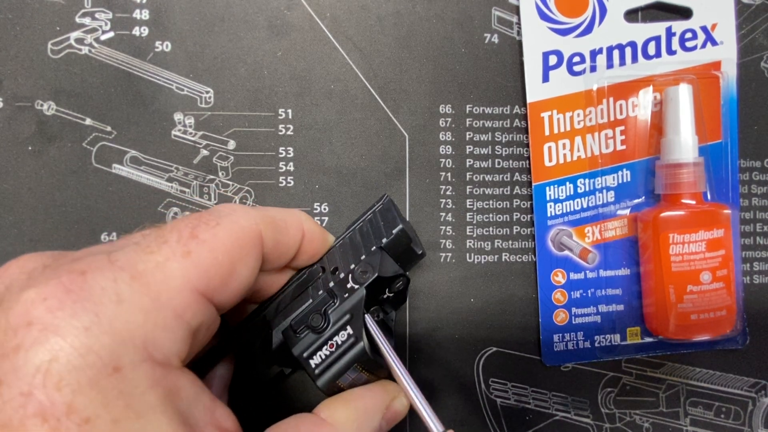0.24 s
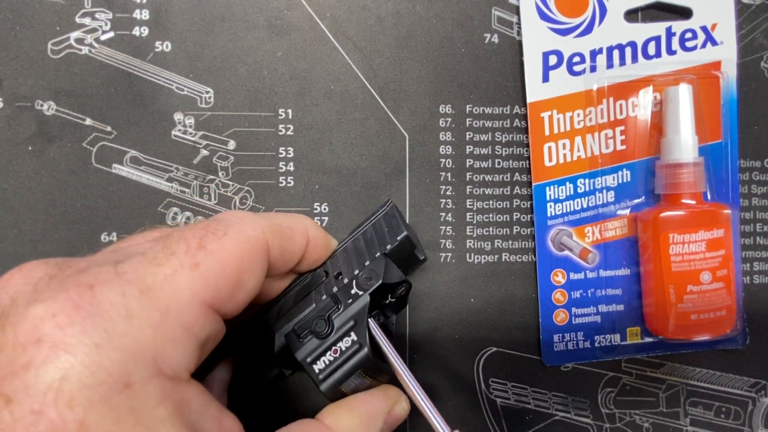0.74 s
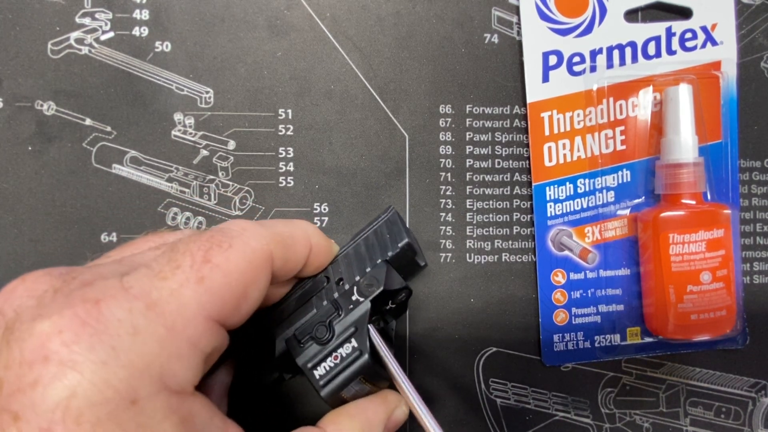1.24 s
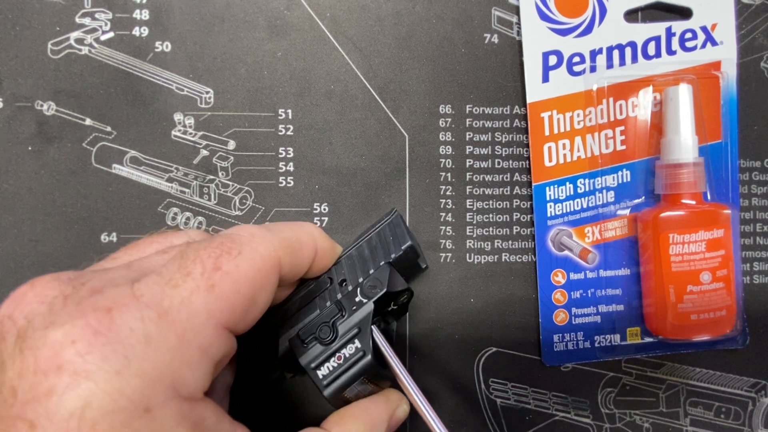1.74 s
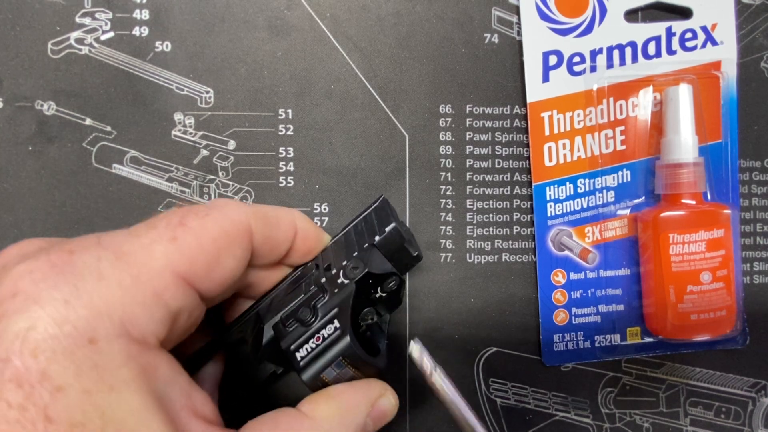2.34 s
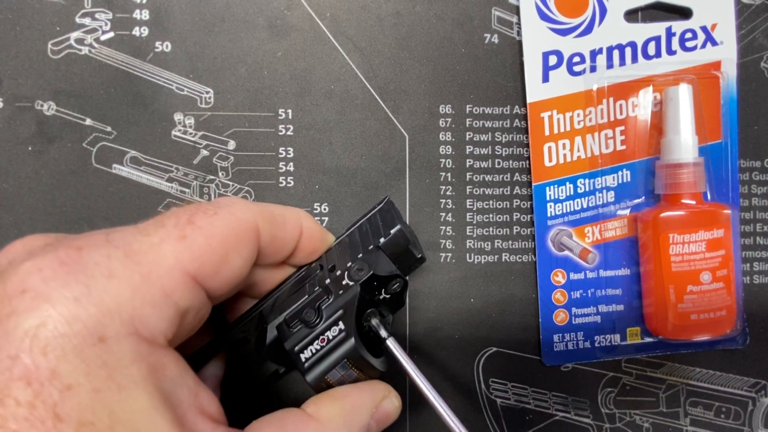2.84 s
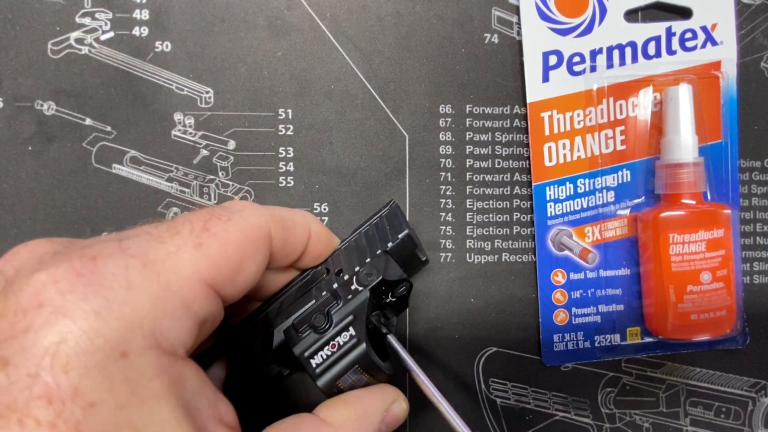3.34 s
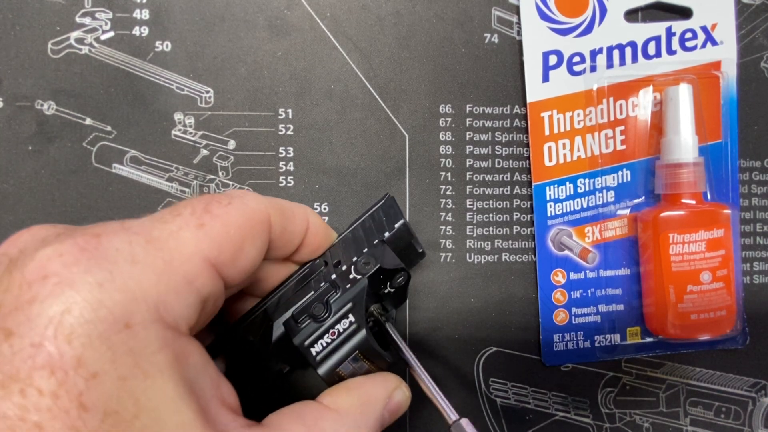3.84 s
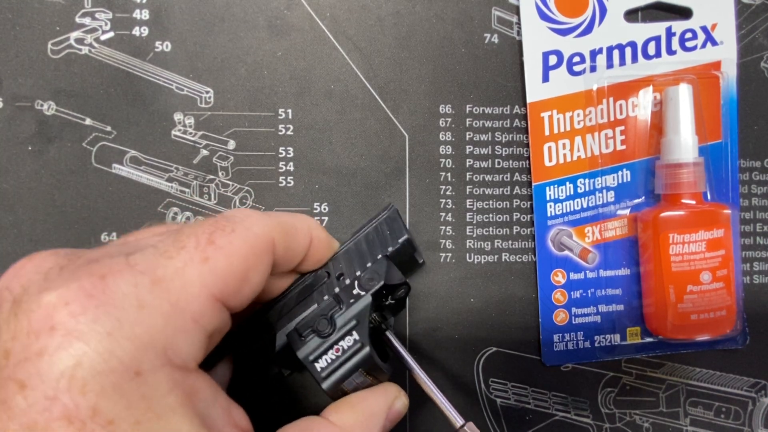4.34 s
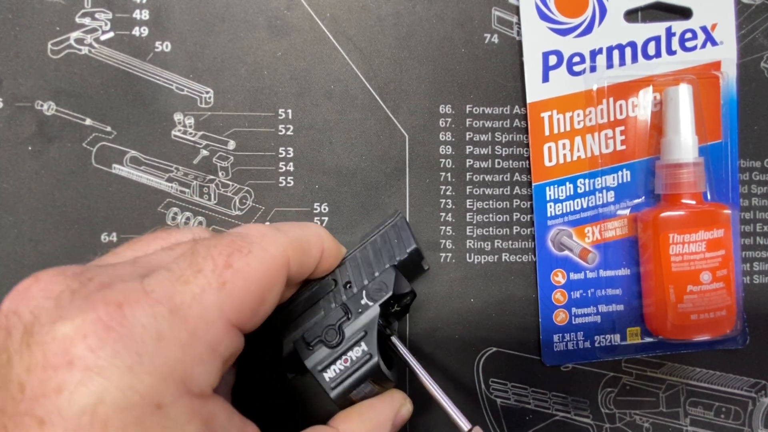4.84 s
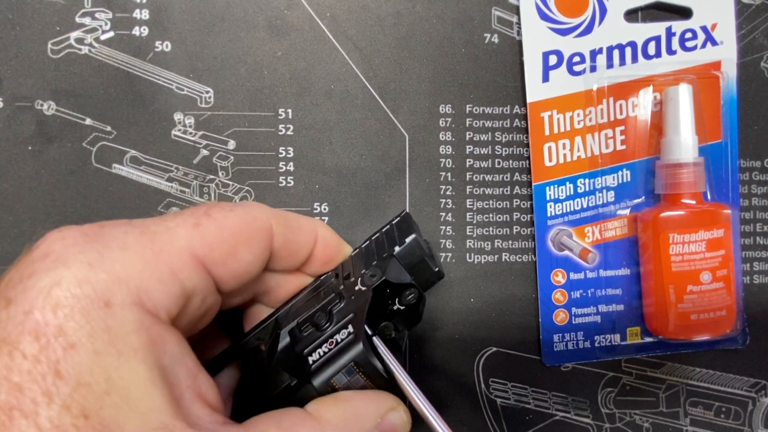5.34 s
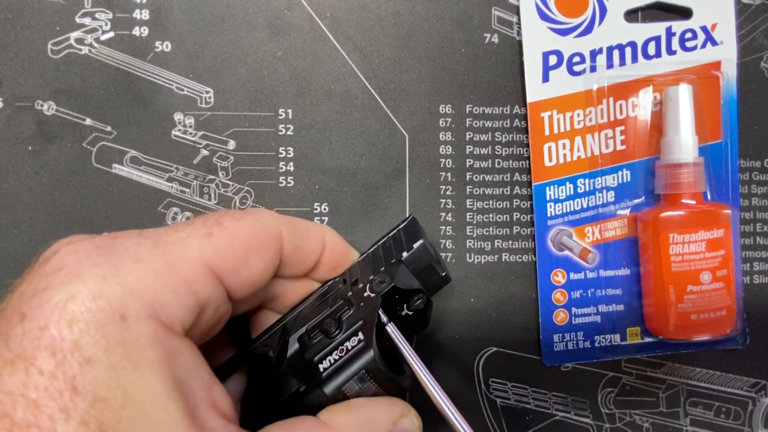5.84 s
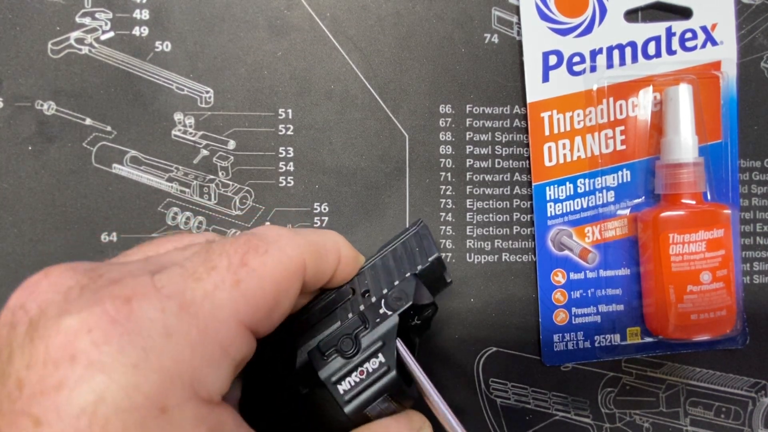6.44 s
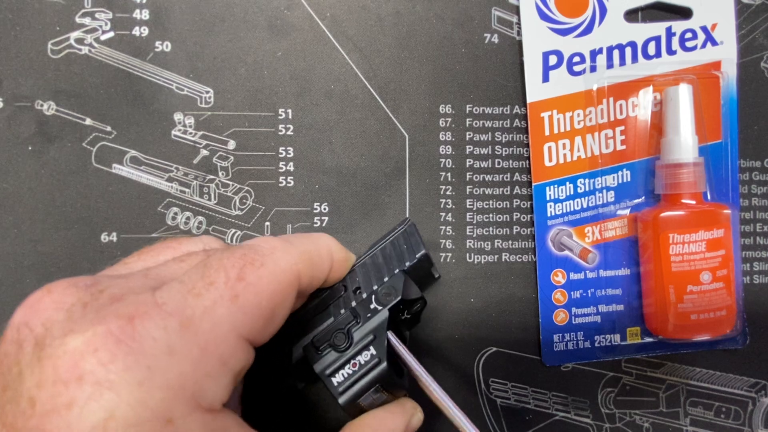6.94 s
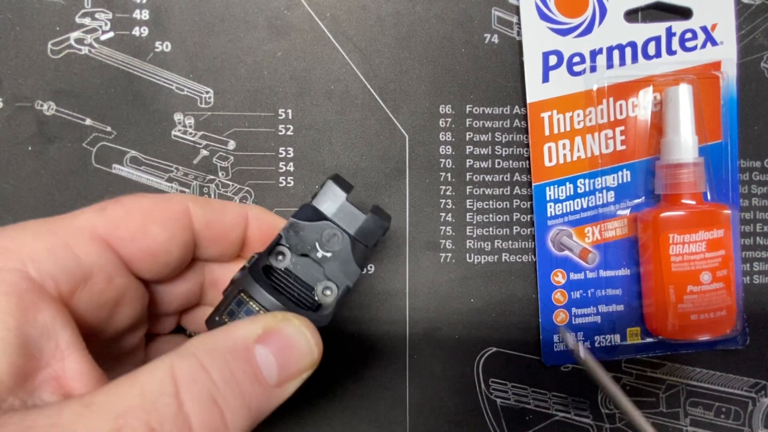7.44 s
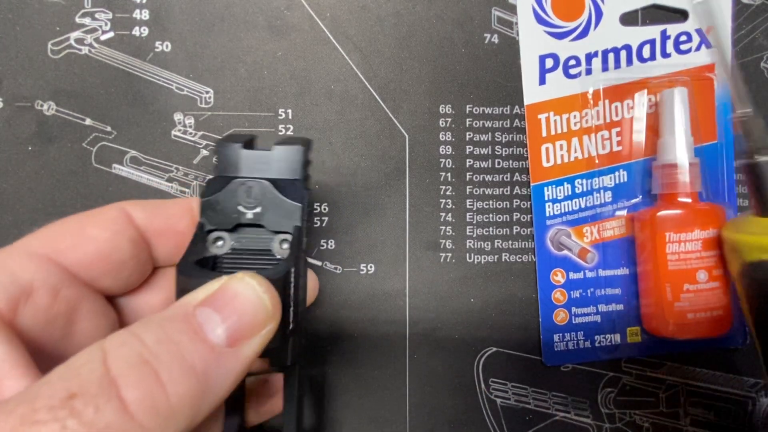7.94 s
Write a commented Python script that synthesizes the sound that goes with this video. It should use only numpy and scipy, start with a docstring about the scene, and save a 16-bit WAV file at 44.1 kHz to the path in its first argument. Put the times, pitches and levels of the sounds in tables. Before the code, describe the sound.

Very close in a small quiet room, a torque screwdriver works on a small metal mount. Light bit knocks come first, then two hard clutch snaps, a bright rattling slide out of the screw, more taps, three quick snaps, another slide with a thin ping, and two last snaps. The tool is finally laid down with a short clatter on the bench. Low room rumble throughout.

```python
"""Torque screwdriver on a metal mount

A small torque screwdriver, close to the microphone, tightens the screws of a hand-held metal mount over a workbench.
At the set torque its cam creaks, scrapes up a ramp, catches and snaps over: shaped noise through the handle's
resonances, with decaying sines for shaft and spring. In between, filtered noise bursts make the bit knock in the screw
heads and slide out of them; at the end the driver is laid on the bench. A small room with a low rumble."""
import sys
import numpy as np
from scipy import signal
from scipy.fft import rfft, irfft, next_fast_len
from scipy.io import wavfile
from scipy.ndimage import uniform_filter1d, minimum_filter1d

SR = 44100
rng = np.random.default_rng(int(sys.argv[2]) if len(sys.argv) > 2 else 0)


def wav_record(signal):
    """Record a signal, one row per channel, as 16-bit PCM in the file named by sys.argv[1]."""
    frames = np.transpose(np.atleast_2d(signal))
    bounded = np.clip(frames, -1, 1)
    # unit amplitude maps onto the largest positive 16-bit level
    quanta = np.round(bounded * 32767).astype(np.int16)
    wavfile.write(sys.argv[1], SR, quanta)


N = 361179
TIME = np.arange(N) / SR
AGE = TIME[:SR]  # 1 s of time since an onset

# clutch snaps: start_s, level_db, catch_lead_s, catch_db, scrape_db, treble_db, shaft_db, spring_db, thump_db
SNAPS = [(1.6506, 7, 0.006, -21.5, -27.5, 0.5, -29, -33, -43.5),
         (1.9617, 2, 0.0085, -11, -23.5, 4.5, -26.5, -31.5, -38),
         (4.3178, 0, 0.0085, -23, -19.5, 6.5, -48.5, -33, -40.5),
         (4.5191, 3, 0.008, -17, -16, 4.5, -44, -35.5, -42),
         (4.7522, -0.5, 0.006, -13, -26.5, 8.5, -40, -35, -47),
         (6.683, 6, 0.0078, -26.5, -29, 2, -40, -47.5, -54.5),
         (6.9426, 2, 0.007, -22.5, -18.5, 0, -32.5, -35.5, -48.5)]
# bit against screw head or mount: start_s, level_db, resonance_hz, tick_db
KNOCKS = [(0.008, -31.5, 1296, -17), (0.22, -33, 3680, -20.5), (0.225, -31.5, 1258, -18),
          (0.252, -39.5, 1240, -23), (0.287, -41, 1710, -18), (0.463, -39, 2670, -38),
          (0.528, -34.5, 1336, -42), (0.712, -32, 2900, -36), (0.808, -40, 1440, -25),
          (1.112, -28.5, 4580, -22.5), (1.244, -32.5, 1372, -33), (3.051, -48.5, 3610, -17.5),
          (3.354, -43, 585, -15), (3.368, -36.5, 2240, -23.5), (3.546, -36, 2170, -13),
          (3.769, -21, 1804, -8), (3.773, -22.5, 637, -30.5), (3.777, -23, 1248, -33.5),
          (4.083, -47, 2380, -19), (4.966, -39.5, 1596, -13), (4.997, -33, 1720, -9),
          (5.142, -44.5, 1730, -27), (5.655, -48.5, 1774, -15.5), (5.944, -47.5, 2320, -18),
          (6.122, -38, 4980, -12.5), (6.196, -42, 3410, -31), (6.334, -29.5, 1366, -19.5),
          (6.542, -45, 2270, -9.5), (6.871, -38.5, 1600, -14), (7.625, -35.5, 5060, -28),
          (7.72, -42.5, 1520, -13), (7.773, -40.5, 1440, -16), (7.839, -45, 845, -21)]
# driver touching the bench: start_s, clack_db, resonance_hz, boom_db
LANDINGS = [(7.97, -34, 710, -46.5), (7.976, -32.5, 4860, -68), (8.057, -20.5, 1550, -32.5),
            (8.062, -23, 1056, -38.5), (8.069, -22.5, 3250, -32), (8.098, -36.5, 4200, -51),
            (8.131, -25.5, 3680, -46), (8.169, -32.5, 3220, -61)]
# treble colour of steel ticks: freq_hz, gain_db
TICK_COLOUR = [(1500, -26), (4000, -12), (5800, 7.5), (8000, 3.5), (11000, 4), (13500, -13.5), (16000, -10)]

CHATTER_T60_S, CHATTER_DB = 0.025, -12


def undb(db):
    """Decibels to gain."""
    return 10 ** (np.asarray(db) / 20)


def fade(t, t60_s):
    """Exponential decay, 60 dB in t60_s, starting at t = 0."""
    return (t >= 0) * np.exp(-np.log(1000) * np.abs(t) / t60_s)


def add(track, sound, start_s):
    """Mix a sound into a track from start_s."""
    start = max(int(start_s * SR), 0)
    part = sound[..., :N - start]
    track[..., start:start + part.shape[-1]] += part


def noise(size, alike):
    """White noise at two ports; alike is the shared fraction of its power."""
    alike = np.clip(alike, 0, 1)
    shared = np.sqrt(alike) * rng.standard_normal(size)
    return shared + np.sqrt(1 - alike) * rng.standard_normal((2, size))


def slips(size, alike, spread_db, hold_s):
    """Stick-slip: noise in short grains of very uneven strength."""
    grain_gain = undb(spread_db * rng.exponential(size=size))
    grain_index = (np.arange(size) / max(hold_s * SR, 1)).astype(int)
    return grain_gain[grain_index] * noise(size, alike)


def waver(rate_hz, size):
    """Random wobble: unit-spread normal values joined by straight lines."""
    step = max(SR / rate_hz, 2)
    return np.interp(np.arange(size) / step, np.arange(size), rng.standard_normal(size))


def convolve(x, response):
    """Pass a sound through an impulse response, keeping its length."""
    full = signal.fftconvolve(np.atleast_2d(x), np.atleast_2d(response), axes=-1)
    return full[:, :x.shape[-1]]


def colour(x, points, size=4096):
    """Minimum-phase filter through (freq_hz, gain_db) points, by folding the cepstrum."""
    hz, db = np.transpose(points)
    grid_hz = np.maximum(np.fft.rfftfreq(size, 1 / SR), 1)
    gain = undb(np.interp(np.log(grid_hz), np.log(hz), db))
    cepstrum = irfft(np.log(gain))
    cepstrum[1:size // 2] *= 2
    cepstrum[size // 2 + 1:] = 0
    return convolve(x, irfft(np.exp(rfft(cepstrum))))


def resonate(x, hz, width_hz):
    """One resonance, gain 1 at its centre."""
    return signal.lfilter(*signal.iirpeak(hz, hz / width_hz, fs=SR), x)


def brighten(x, db, corner_hz):
    """First-order treble shelf."""
    low = signal.lfilter(*signal.butter(1, corner_hz, fs=SR), x)
    return low + undb(db) * (x - low)


def ring(modes):
    """Struck modes as decaying sines, each detuned slightly at every blow."""
    total = 0
    for hz, db, t60_s in modes:
        detuned_hz = hz * (1 + .001 * rng.standard_normal())
        total = total + undb(db) * fade(AGE, t60_s) * np.sin(2 * np.pi * detuned_hz * AGE)
    return total


def unit(x):
    """Scale a contact to the energy, over both ports, of 10 ms at rms 1."""
    return x / np.sqrt(np.sum(x ** 2) / (.01 * SR))


def strike(start_s, db, hz, tick_db, t60_s, chatter_db, size=8000):
    """One contact as (sound, start): scuff, impact and uneven chatter excite one resonance and a treble tick."""
    # broad body of a contact: freq_hz, gain_db
    tap_colour = [(100, -29), (400, -2.5), (700, -6.5), (1300, 1), (2500, 5), (3600, 0.5), (5500, 0.5),
                  (7500, -21.5), (11000, -27.5), (16000, -33.5)]
    lead_s, scuff_db = .01, -31  # steel brushes steel just before contact
    note_db, note_q = -3, 4.9  # note level against the body; Q of each of two passes
    t = AGE[:size] - lead_s
    chatter = undb(chatter_db) * fade(t, max(t60_s, .002))
    scuff = undb(scuff_db) * fade(-t, 0.097)
    impact = fade(t, .004) * noise(size, alike=0.61)
    contact = impact + (chatter + scuff) * slips(size, alike=0.43, spread_db=4.0, hold_s=0.00041)
    note = resonate(resonate(contact, hz, hz / note_q), hz, hz / note_q)
    body = unit(unit(colour(contact, tap_colour)) + undb(note_db) * unit(note))
    tick = undb(tick_db) * unit(colour(contact, TICK_COLOUR))
    return undb(db) * unit(body + tick), start_s - lead_s


def rumble():
    """Steady room rumble with a slight flicker, turned down after 4.3 s by the recorder's slow automatic gain."""
    # recorder's slow gain on the rumble: time_s, level_db
    slow_gain = [(0, -53.5), (4.3, -53), (4.4, -55), (5.2, -59), (6.3, -57.5), (7.1, -60.5), (7.9, -57)]
    # spectrum: freq_hz, gain_db
    rumble_colour = [(20, -34), (32, -17.5), (50, -8.5), (130, -5), (300, -8.5), (480, -17.5), (1000, -23),
                     (1450, -32), (2100, -38), (3000, -38), (3800, -45.5), (5700, -40.5), (7000, -56),
                     (16000, -56.5)]
    # the bass is alike at both ports, the hiss is not
    highpass = signal.butter(1, 600, "high", fs=SR, output="sos")
    side = signal.sosfilt(highpass, rng.standard_normal(N))
    air = colour(rng.standard_normal(N) + side * np.array([[1], [-1]]), rumble_colour)
    level_db = np.interp(TIME, *np.transpose(slow_gain)) + 1.6 * waver(rate_hz=16, size=N)
    return air / np.std(air) * undb(level_db)


def rubbing():
    """Skin and steel slide in short strokes: a soft hiss of tiny slips, with faint ticks as the bit shifts."""
    # strokes of fingers and tool: middle_s, length_s, level_db
    rubs = [(0.03, 0.44, -57), (.355, 0.071, -51), (.64, 0.36, -58), (1.48, 0.19, -65.5),
            (2.92, 0.1, -63.5), (3.326, 0.21, -71.5), (4.08, 0.19, -62), (5.308, .1, -62),
            (6.274, 0.11, -73), (6.53, .25, -66.5), (7.354, 0.14, -72), (7.827, 0.21, -61.5),
            (8.09, 0.32, -54)]
    # spectrum: freq_hz, gain_db
    rub_colour = [(300, -11.5), (1500, -1), (3000, -4), (5500, 2), (7500, -14), (11000, -6.5), (13500, -23),
                  (16000, -11.5)]
    ticks_per_s, tick_db = 20, 11.5
    stroke = sum(undb(db) * np.exp(-4 * ((TIME - s) / length_s) ** 2) for s, length_s, db in rubs)
    hiss = colour(slips(N, alike=0.59, spread_db=3.0, hold_s=0.00061), rub_colour)
    shifts = (rng.random(N) < ticks_per_s / SR) * rng.uniform(0.64, 1, N)
    ticks = colour(convolve(shifts, fade(AGE, 0.02)) * noise(N, alike=0.53), rub_colour)
    return stroke * (hiss + undb(tick_db) * ticks)


def chatter_t60_s(hz):
    """A knock chatters for longer the lower its resonance."""
    return CHATTER_T60_S * (1500 / hz) ** 0.61


def knocks():
    """The bit knocks as the hand takes a new grip; each knock shares out the mount's ring differently."""
    # ring of the mount: freq_hz, level_db, t60_s
    mount_modes = [(617, -1.5, 0.098), (1244, -2.5, 0.079), (1650, -6.5, .08), (2344, -3.5, .13),
                   (2758, -7.5, 0.046), (3400, -12, 0.025)]
    mount_ring_db = -11  # against the knock
    # above tip_hz the tip alone makes the knock and rings the mount less
    tip_hz, drop_db_per_octave = 2190, 8
    out = np.zeros((2, N))
    for s, db, hz, tick_db in KNOCKS:
        add(out, *strike(s, db, hz, tick_db, chatter_t60_s(hz), CHATTER_DB))
        modes = [(mode_hz, mode_db + 2.3 * rng.standard_normal(), t60_s)
                 for mode_hz, mode_db, t60_s in mount_modes]
        ring_db = mount_ring_db - drop_db_per_octave * max(np.log2(hz / tip_hz), 0)
        add(out, undb(db + ring_db) * ring(modes), s)
    return out


def rattles():
    """The bit has play: a faint contact follows each knock with random gap, strength and pitch."""
    within_s, level_db, spread_db, centre_hz, tick_db = .045, -53, 4.5, 1987, -18
    out = np.zeros((2, N))
    for s, *_ in KNOCKS:
        gap, strength, octaves = rng.uniform(-1, 1, 3)
        start_s = s + within_s * abs(gap)
        db = level_db + spread_db * strength
        hz = centre_hz * 2 ** (octaves / 2)
        add(out, *strike(start_s, db, hz, tick_db, CHATTER_T60_S, CHATTER_DB))
    return out


def creaks():
    """While the hand winds up to a snap, the loaded cam slips in faint bright random ticks."""
    wind_up_s, creaks_per_s, level_db, spread_db, t60_s = 0.16, 25, -55.5, 4, 0.012
    loaded = sum((TIME > s - wind_up_s) & (TIME < s) for s, *_ in SNAPS)
    happens = rng.random(N) < creaks_per_s / SR
    ticks = loaded * happens * undb(level_db + spread_db * rng.standard_normal(N))
    return colour(convolve(ticks, fade(AGE, t60_s)) * noise(N, alike=.6), TICK_COLOUR)


def clutch():
    """The cam scrapes up its ramp, catches, snaps over and rebounds; the handle barks, shaft and spring ring on."""
    # ring of the shaft: freq_hz, level_db, t60_s
    shaft_modes = [(1153, 0, .28), (1670, -14, .2)]
    # ring of the spring: freq_hz, level_db, t60_s
    spring_modes = [(1992, -1, .28), (2093, 7, .18), (2150, -3, .16), (2275, 2, .06), (2376, -6, .32),
                    (2922, -15, .6), (5300, -6, .1)]
    # short resonances of the handle: freq_hz, width_hz, level_db
    handle_modes = [(648, 70, -4.5), (1203, 34, -3), (1635, 130, -6), (2220, 190, 11.5), (2800, 110, -4.5),
                    (3519, 1800, -5.5), (5100, 710, 6), (5833, 400, -3)]
    # bare crack of steel on steel: freq_hz, gain_db
    crack_colour = [(100, -15), (450, -10), (850, -24.5), (1500, -11.5), (4000, -10.5), (6500, -15),
                    (8500, -19), (11000, -17), (13500, -32), (15000, -23)]
    force, rings = np.zeros((2, N)), np.zeros((2, N))
    lead_s = .04
    t = AGE[:int(2 * lead_s * SR)] - lead_s
    for s, db, catch_lead_s, catch_db, scrape_db, treble_db, shaft_db, spring_db, _ in SNAPS:
        hard = fade(t, .003) + undb(catch_db) * fade(t + catch_lead_s, 0.0043)
        # the cam slides loudest for about 12 ms, tips over the crest, then lands again: all duller than the snap
        ramp = fade(-t, 0.037) * np.where(t > -.0125, 1, .3)
        crest = undb(-1.0) * fade(t + 0.0012, 0.0048)
        sliding = undb(scrape_db) * (ramp + crest)
        rebound = undb(-4.5) * fade(t - .0019, 0.0049) + undb(-22.0) * fade(t, 0.08)
        soft = (sliding + rebound) * slips(len(t), alike=0.63, spread_db=3.0, hold_s=0.0009)
        contact = hard * noise(len(t), alike=0.3) + brighten(soft, db=-15.5, corner_hz=3900)
        add(force, undb(db) * brighten(contact, treble_db, corner_hz=4000), s - lead_s)
        add(rings, undb(shaft_db) * ring(shaft_modes) + undb(spring_db) * ring(spring_modes), s)
    bark = sum(undb(db) * resonate(force, hz, width_hz) for hz, width_hz, db in handle_modes)
    return colour(force, crack_colour) + bark + rings


def recoil():
    """Each snap jolts the hands: a soft thump that sinks in pitch."""
    out = np.zeros(N)
    pitch_hz = 46 + 70 * fade(AGE, 0.12)
    envelope = np.exp(-(AGE / 0.11) ** 2)
    for s, *_, thump_db in SNAPS:
        add(out, undb(thump_db) * envelope * np.sin(2 * np.pi * np.cumsum(pitch_hz) / SR), s)
    return out


def slides():
    """The bit grazes the rim of a screw head, rattles brightly along it and rings from the first full contact."""
    # bit leaving or entering a screw head: start_s, level_db, rattle_t60_s, tick_db
    slide_events = [(2.213, -29.5, 0.118, -1.5), (2.865, -43, 0.018, -9.5), (2.943, -48, 0.016, -5.5),
                    (5.268, -37.5, 0.054, 3.5), (5.338, -46, 0.075, -11), (7.144, -35, 0.075, 2)]
    # ring of the bit: freq_hz, level_db, t60_s
    bit_modes = [(1263, -27, 0.067), (2940, -18, 0.16)]
    slide_hz, graze_lead_s, graze_db = 5100, 0.01, -16.5
    out = np.zeros((2, N))
    for s, db, t60_s, tick_db in slide_events:
        add(out, *strike(s - graze_lead_s, db + graze_db, slide_hz, tick_db, CHATTER_T60_S, CHATTER_DB))
        add(out, *strike(s, db, slide_hz, tick_db, t60_s, CHATTER_DB))
        add(out, undb(db) * ring(bit_modes), s)
    return out


def ping():
    """Once, on its way out, the bit's steel tip is plucked by the rim and rings in thin tones."""
    # ring of the tip: freq_hz, level_db, t60_s
    tip_modes = [(2980, -6, .18), (4063, 0, .26), (4620, 0, .26)]
    start_s, level_db = 5.268, -53.5
    out = np.zeros(N)
    add(out, undb(level_db) * ring(tip_modes), start_s)
    return out


def clatter():
    """The driver's handle clacks on the bench and rocks to rest: a run of noisy contacts."""
    out = np.zeros((2, N))
    for s, db, hz, _ in LANDINGS:
        add(out, *strike(s, db, hz, tick_db=-14, t60_s=0.047, chatter_db=-9))
    return out


def bench():
    """The bench top booms in its own modes just after each landing."""
    # ring of the bench top: freq_hz, level_db, t60_s
    bench_modes = [(51, 3.5, 0.44), (84, -1.5, 0.1), (116.8, 6.5, 0.16), (210, 4, 0.02), (331, -1.5, 0.034),
                   (395, -6.5, 0.059), (538, 2.5, 0.041), (620, -2.5, 0.12), (1040, -5, .06)]
    boom_lag_s = .011
    out = np.zeros(N)
    for s, *_, boom_db in LANDINGS:
        add(out, undb(boom_db) * ring(bench_modes), s + boom_lag_s)
    return out


def ports(x):
    """Close to the microphone each pitch reaches the two ports with its own level and phase."""
    # tool at the two ports: freq_hz, left_minus_right_db, left_lead_rad
    port_offsets = [(200, 0.5, -3), (650, 0.5, -1.5), (1300, 9.5, 1.36), (2380, 1.5, 0.1), (3320, 4.5, 1.5),
                    (5350, -2.5, -1), (8640, -1.5, -2.5), (11500, -0.5, 8.5), (12800, 1.5, 3.5),
                    (15800, 0.5, 1.5)]
    hz, db, lead_rad = np.transpose(port_offsets)
    size = next_fast_len(N + SR)
    grid_hz = np.fft.rfftfreq(size, 1 / SR)
    # half the offset goes to each port, in opposite senses
    half = undb(np.interp(grid_hz, hz, db) / 2) * np.exp(.5j * np.interp(grid_hz, hz, lead_rad))
    return irfft(rfft(x, size) * np.array([half, 1 / half]), size)[:, :N]


def room(x):
    """Diffuse noise tail from 3 ms on: each band has its own decay under a stronger, quick early part."""
    # bands of the tail: freq_hz, level_db, t60_s
    room_bands = [(300, -22.5, 0.29), (1000, -9, 0.22), (2090, -11.5, .34), (4000, -11, 0.33),
                  (6500, -17.5, 0.3), (9700, -26, 0.78), (14000, -24, .2)]
    hz, db, t60_s = np.transpose(room_bands)
    log_grid = np.log(np.maximum(np.fft.rfftfreq(len(AGE), 1 / SR), 1))
    spectrum = rfft(noise(len(AGE), alike=0))
    tail = 0
    for share, band_db, band_t60_s in zip(np.eye(len(hz)), db, t60_s):
        envelope = (fade(AGE, band_t60_s) + undb(6) * fade(AGE, 0.069)) * (AGE > .003)
        band = irfft(spectrum * np.interp(log_grid, np.log(hz), share), len(AGE))
        tail = tail + undb(band_db) * envelope / np.linalg.norm(envelope) * band
    return convolve(x, tail)


def limit(x, ceiling_db, release_db_per_s, size=45):
    """Limiter: the gain drops just ahead of a peak and creeps back, ducking everything meanwhile."""
    over_db = np.maximum(20 * np.log10(np.abs(x).max(axis=0) + 1e-9) - ceiling_db, 0)
    release_db = release_db_per_s * TIME
    cut_db = np.maximum.accumulate(over_db + release_db) - release_db
    return x * uniform_filter1d(minimum_filter1d(undb(-cut_db), size), size)


def scene():
    """The tool works close to both ports and is put down slightly to the right, in a small room."""
    tool = clutch() + knocks() + rattles() + slides() + creaks() + rubbing()
    pan_db = -1  # left minus right
    laid_down = clatter() * undb(np.array([[pan_db], [-pan_db]]) / 2)
    direct = ports(tool) + ping() + laid_down
    return direct + room(tool + laid_down) + recoil() + bench() + rumble()


def record(dry):
    """The recorder cuts the deepest bass, limits the peaks and cuts the top."""
    highpass = signal.butter(4, 38, "high", fs=SR, output="sos")
    lowpass = signal.ellip(10, .2, 80, 16300, fs=SR, output="sos")
    thinned = signal.sosfilt(highpass, dry)
    limited = limit(thinned, ceiling_db=-2.5, release_db_per_s=36.5)
    return signal.sosfilt(lowpass, limited)


dry = scene()
out = record(dry)
wav_record(out)
```